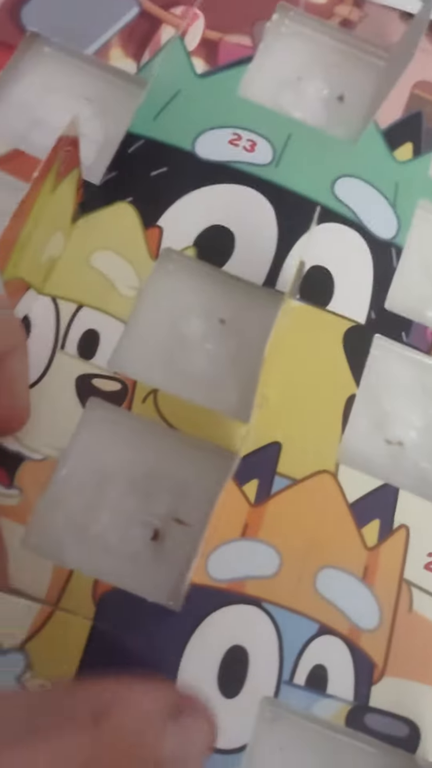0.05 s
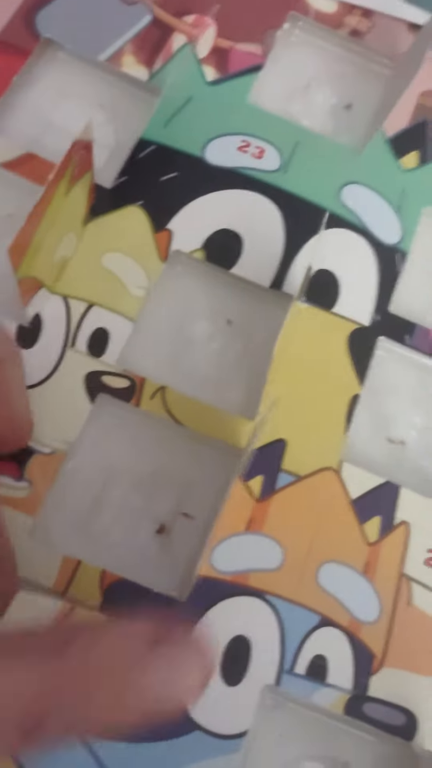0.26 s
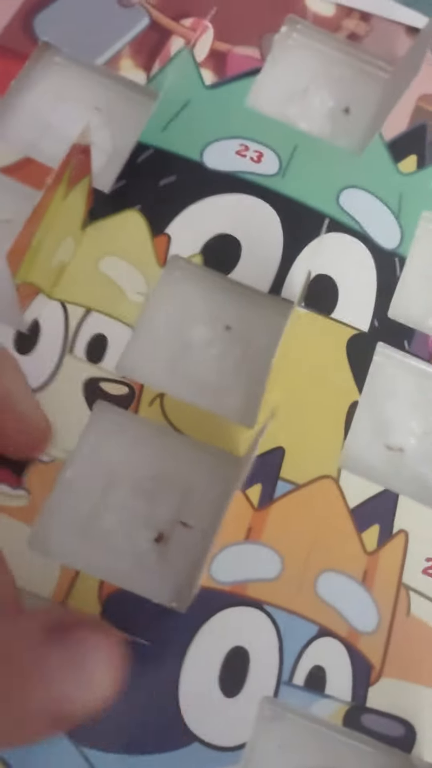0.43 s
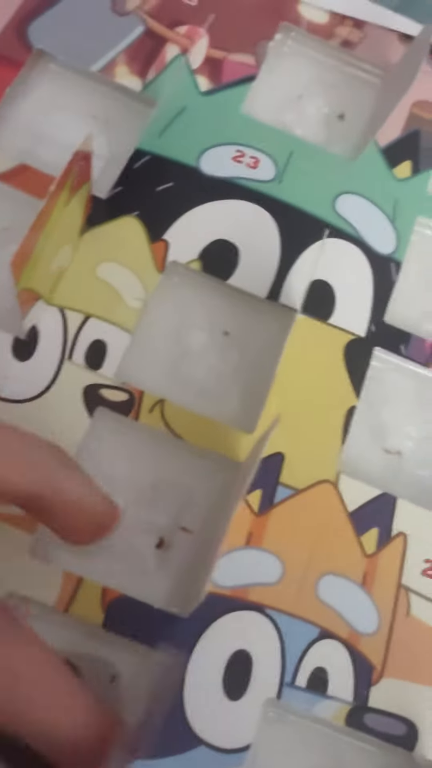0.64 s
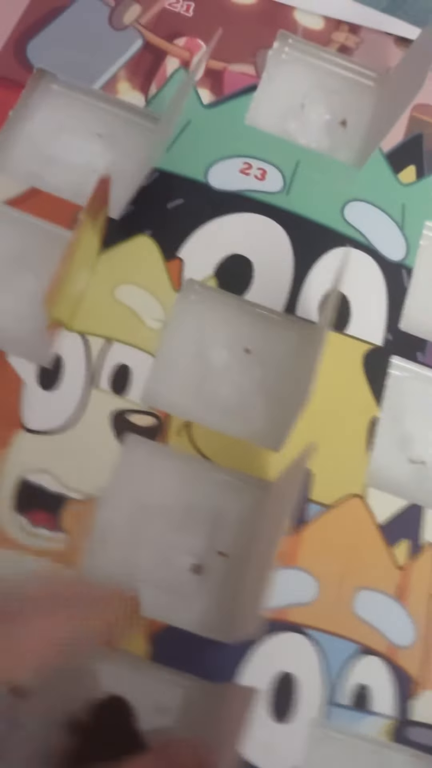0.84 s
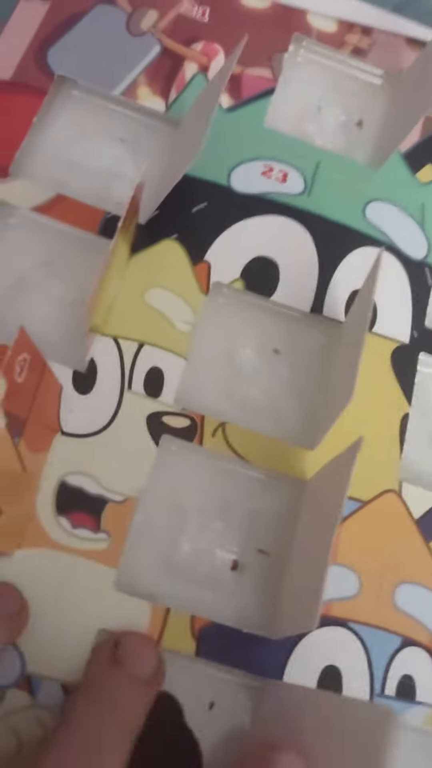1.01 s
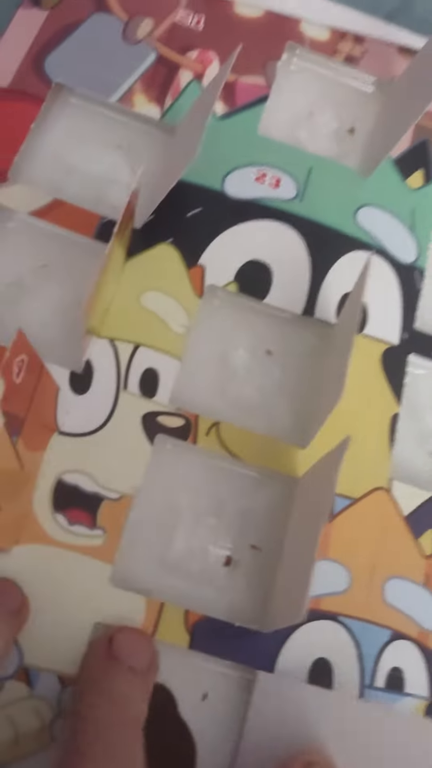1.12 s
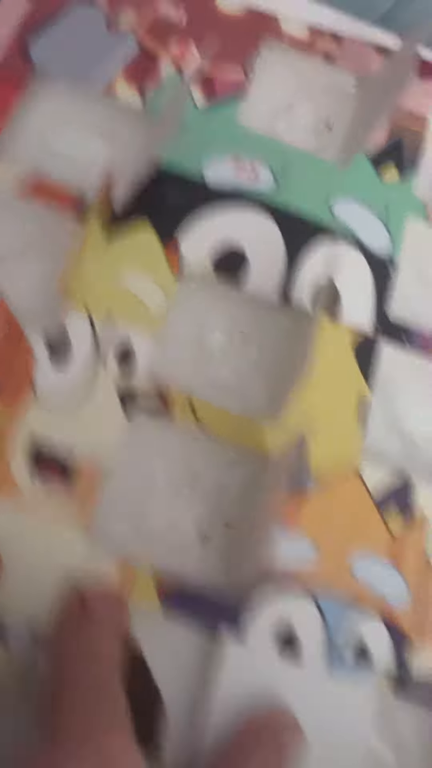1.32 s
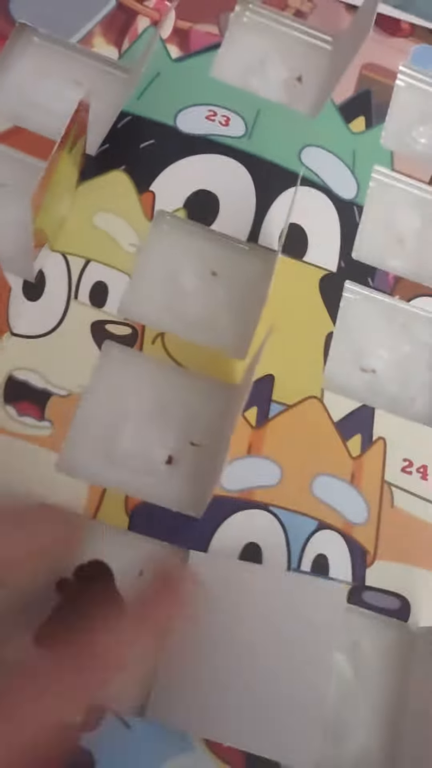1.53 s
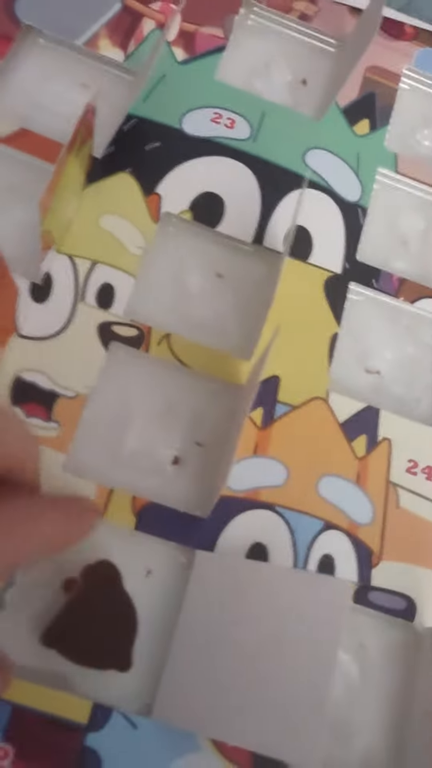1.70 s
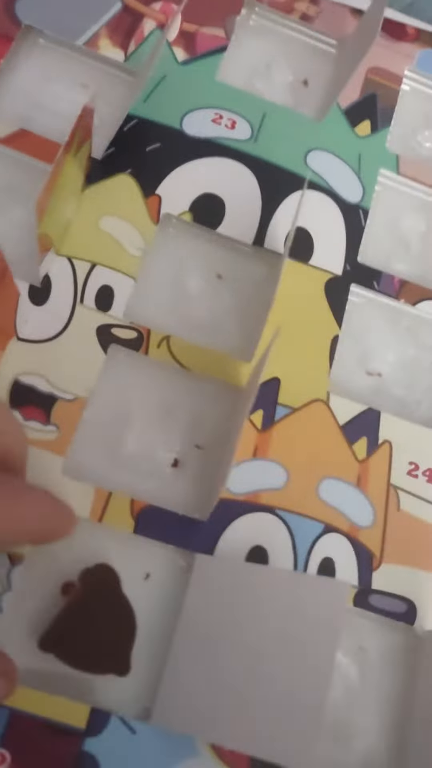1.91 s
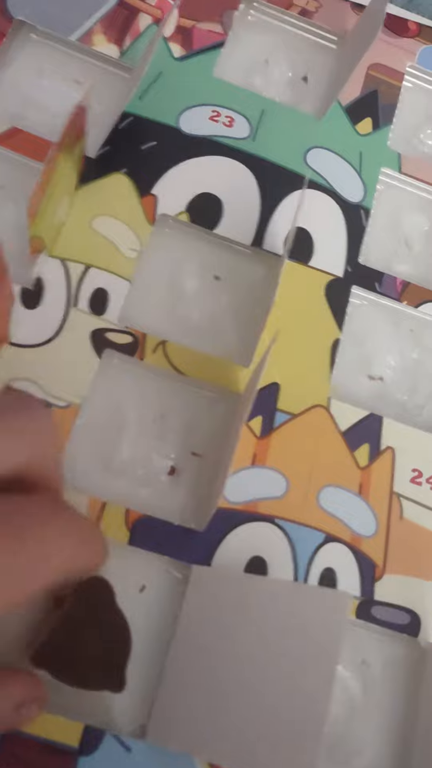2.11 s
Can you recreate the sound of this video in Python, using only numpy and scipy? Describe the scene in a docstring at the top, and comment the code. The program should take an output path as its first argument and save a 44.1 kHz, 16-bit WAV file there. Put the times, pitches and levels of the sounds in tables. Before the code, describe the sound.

A finger tears open a perforated cardboard door, with sharp snaps and hollow knocks in the first half second, then a small dry creak and light fingertip rubbing, close to a phone in a small quiet room.

```python
"""In a small room, close to a phone, a finger tears open a perforated door of a cardboard calendar.
The paper tabs snap one by one as bursts of noise, and four knocks ring the hollow box in decaying tones.
The plastic tray pings, and the door creaks on its fold in tiny slips and ringing grains.
Fingertips bump, tick and slide on the card, made of short or filtered noise; the room adds a brief
noise tail to it all, over a faint background."""
import sys
import numpy as np
from scipy import signal
from scipy.fft import rfft, irfft
from scipy.io import wavfile
from scipy.ndimage import uniform_filter1d, minimum_filter1d

SR = 44100
rng = np.random.default_rng(int(sys.argv[2]) if len(sys.argv) > 2 else 0)


def wrap_up_sound(samples):
    """Save the sound to the file named by the first command line argument, as 16-bit audio."""
    columns = np.atleast_2d(samples).T
    # keep every value between -1 and 1, then stretch to whole-number steps
    tamed = np.clip(columns, -1, 1)
    steps = np.round(tamed * 32767).astype(np.int16)
    wavfile.write(sys.argv[1], SR, steps)


N = 94815  # length of the scene in samples

# tone of fingertips sliding on card, also used for the ring left at the start: f/Hz, level/dB
SLIDE_TONE = [(200, -11.5), (500, 0), (1400, 0.5), (2000, -2.5), (5400, -2), (7200, 1.5), (8500, -6.5),
              (15000, -5.5)]
CLICK_SPREAD, RUSTLE_SPREAD = .5, .75  # opposed part over shared part, left and right
SLIDE_RATE, SLIDE_SCATTER_DB = 3000, 4  # slips per second, unevenness of their levels


def amp(db):
    """Turn decibels into a gain."""
    return 10 ** (np.asarray(db) / 20)


def unit(x):
    """Scale to an rms of 1."""
    return x / np.sqrt(np.mean(x ** 2) + 1e-30)


def decay(t, t60):
    """A fade that falls by 60 dB in t60 seconds."""
    return np.exp(-np.log(1000) * t / t60)


def colour(x, points):
    """Filter by a curve of (f/Hz, level/dB) points."""
    hz, db = np.array(points, float).T
    n = x.shape[-1]
    f = np.maximum(np.fft.rfftfreq(2 * n, 1 / SR), 1)
    gain = amp(np.interp(np.log(f), np.log(hz), db))
    return irfft(rfft(x, 2 * n) * gain)[..., :n]


def resonate(x, hz, width):
    """One resonance, with gain 1 at its centre."""
    b, a = signal.iirpeak(hz, hz / width, fs=SR)
    return signal.lfilter(b, a, x)


def add(out, x, s):
    """Mix a short sound in at a time in seconds."""
    i = int(s * SR)
    out[..., i:i + x.shape[-1]] += x[..., :N - i]


def at_level(x, db):
    """Give a short sound the energy of 5 ms at this level."""
    energy = np.mean(np.sum(x ** 2, axis=-1))
    return x * amp(db) * np.sqrt(.005 * SR / energy)


def two_ports(mid, side, spread):
    """Send a shared part and an opposed part to left and right."""
    return np.array([mid + spread * side, mid - spread * side])


def pan(x, db):
    """Make the left louder than the right by this much."""
    return x * amp([[db / 2], [-db / 2]])


def flutter(size, rate, depth_db):
    """A gain that wanders between random levels, with `rate` new levels per second."""
    levels = rng.standard_normal(size)
    return amp(depth_db * np.interp(np.arange(size) / SR * rate, np.arange(size), levels))


def background():
    """Faint room noise and a low rumble: two layers of filtered noise."""
    # tone of the room noise: f/Hz, level/dB
    floor_tone = [(20, -35.5), (65, -5), (300, 4), (1060, -12.5), (4640, -17), (5420, -24), (12100, -20.5),
                  (15700, -55.5), (22000, -120)]
    # tone of the rumble: f/Hz, level/dB
    rumble_tone = [(20, -22.5), (45, -11.5), (85, 5), (130, -15), (270, -5), (600, -20.5), (2000, -51.5)]
    out = np.zeros((2, N))
    for points, db in [(floor_tone, -68), (rumble_tone, -76)]:
        noise = two_ports(*rng.standard_normal((2, N)), spread=.36)
        out += unit(colour(noise, points)) * amp(db)
    return out


def room(x):
    """Reflections as fading noise: a quick dense tail and a fainter long one."""
    # tone of the tail: f/Hz, level/dB
    room_tone = [(120, -10.5), (250, 3), (600, 4), (1200, 0), (2500, 1.5), (4600, 0.5), (5300, 1.5),
                 (6100, 2.5), (8500, 1.5), (11000, -2.5), (15000, -12)]
    room_db, room_t60_s, swell_s = -17, .2, .0067  # the tail swells in before it fades
    late_db, late_t60_s = -26, .41  # long tail, relative to the quick one
    opening_db = -46.5  # start level of a ring already dying away
    t = np.arange(int(SR * .7)) / SR
    fade = decay(t, room_t60_s) + amp(late_db) * decay(t, late_t60_s)
    # reflections arrive in clumps
    clumps = rng.standard_normal((2, len(t))) * flutter(len(t), rate=400, depth_db=3.5)
    tail = colour(clumps, room_tone) * fade * np.minimum(t / swell_s, 1) ** 2
    tail = unit(tail) / np.sqrt(len(t)) * amp(room_db)
    dying = unit(colour(rng.standard_normal((2, N)), SLIDE_TONE))
    dying *= amp(opening_db) * decay(np.arange(N) / SR, room_t60_s)
    return signal.fftconvolve(x, tail, axes=1)[:, :N] + dying


def rustle(curve, tone, rate, scatter_db):
    """Dense tiny slips of uneven size that come in jerks, following a level curve."""
    happens = rng.random((2, N)) < rate / SR
    direction = rng.choice([-1, 1], (2, N))
    size = amp(scatter_db * np.minimum(rng.exponential(size=(2, N)), 4))
    jerky = happens * direction * size * flutter(N, rate=90, depth_db=2.8)
    rub = colour(two_ports(*jerky, RUSTLE_SPREAD), tone)
    s, db = np.array(curve).T
    return unit(rub) * amp(np.interp(np.arange(N) / SR, s, db, left=-120, right=-120))


def fold():
    """The door creaks on its fold as the card slips in small jerks."""
    # level curve, before the rubbing gain: t/s, level/dB
    fold_curve = [(.09, -79), (.2, -57), (.25, -39), (.37, -73), (.44, -49.5), (.62, -47.5), (.67, -54.5),
                  (.72, -66), (.95, -73), (1.03, -56.5), (1.14, -54.5), (1.19, -46.5), (1.27, -87.5)]
    # tone: f/Hz, level/dB
    fold_tone = [(200, -21), (450, -15.5), (1100, -23), (1900, -26.5), (2700, -8.5), (4300, -3), (5400, -7),
                 (6400, -11), (7600, 2.5), (8400, -2.5), (10000, -4), (11500, 3), (15000, -8)]
    return rustle(fold_curve, fold_tone, rate=1500, scatter_db=5)


def bumps():
    """Soft, dull fingertip touches: short noise pushes through two equal resonances of the card."""
    # touches: t/s, f/Hz, level/dB
    touches = [(.108, 606, -42.5), (.375, 700, -48.5), (.432, 507, -54), (.606, 336, -46.5),
               (.641, 327, -46.5), (1.225, 760, -48.5), (1.305, 524, -60), (1.396, 900, -55.5),
               (1.452, 680, -52.5), (1.523, 550, -58), (1.724, 763, -57.5), (1.908, 601, -60),
               (2.064, 305, -55), (2.103, 733, -57), (2.115, 760, -51.5), (2.131, 770, -54.5)]
    relative_width, decay_s = .6, .0025  # resonance width over pitch, fall of the push
    t, out = np.arange(SR // 16) / SR, np.zeros((2, N))
    for s, hz, db in touches:
        push = two_ports(*rng.standard_normal((2, len(t))), CLICK_SPREAD) * np.exp(-t / decay_s)
        once = resonate(push, hz, hz * relative_width)
        twice = resonate(once, hz, hz * relative_width)
        add(out, at_level(twice, db), s)
    return out


def clicks(rows):
    """Fibres start to part in a quick rise, a sharp crack tops it, and they fade within milliseconds.

    The bass and middle let go more slowly than the presence and treble."""
    # edges of the bass, middle, presence and treble bands: f/Hz
    band_edges = [190, 600, 3000, 7000, 14500]
    # release of a click in those four bands: time/s
    releases = [0.0029, 0.0032, 0.0017, 0.001]
    attack_s, crack_db = .0009, 5.5  # rise of the fibres; crack over the fibres
    size = 2048
    t, out = np.arange(size) / SR, np.zeros((2, N))
    bands = [signal.butter(3, band_edges[k:k + 2], "band", fs=SR, output="sos") for k in range(4)]
    for s, length, *dbs, pan_db in rows:
        fibres = two_ports(*rng.standard_normal((2, size)), CLICK_SPREAD)
        fibres *= np.minimum(t / attack_s, 1)
        fibres[:, int(attack_s * SR)] += amp(crack_db)
        for sos, db, release in zip(bands, dbs, releases):
            burst = fibres * np.exp(-np.maximum(t - length, 0) / release)
            band = at_level(signal.sosfilt(sos, burst), db)
            add(out, pan(band, pan_db), s)
    return out


def ticks():
    """Small ticks of card and tray, and the last fibres of the long tear, as very short clicks."""
    # ticks, before the tick gain: t/s, middle/dB, presence/dB, treble/dB, left minus right/dB
    tick_rows = [(0.109, -58.5, -55, -40.5, -7.5), (.1500, -46, -51, -39.5, 4), (0.1549, -67, -64, -41, 2),
                 (0.167, -44.5, -54, -71, -2), (0.2714, -33, -24, -39, 2), (0.2743, -33, -30, -33, 7),
                 (0.2811, -38, -29, -39, 4.5), (0.2871, -45, -29, -40, 5), (0.4075, -53, -48, -29.5, -1.5),
                 (0.4373, -59, -53, -42, -1), (0.4712, -50.5, -61, -38, -5), (0.6622, -79, -58, -43.5, -7),
                 (0.6862, -54.5, -47, -37, 3), (.9100, -45.5, -45, -45, -2), (1.0180, -70, -47.5, -44.5, 7),
                 (1.062, -68, -54, -45, 13), (1.1151, -66, -51, -40.5, 7.5), (1.1617, -83, -45, -38, 2),
                 (1.1757, -72, -45, -37.5, 7.5), (1.2098, -45.5, -36.5, -39, -2.5),
                 (1.213, -42.5, -35, -45, 2.5), (1.2258, -47, -47.5, -67, -7), (1.4081, -61, -50, -68, 1),
                 (1.3010, -62, -63, -70, 2), (1.5609, -52.5, -62, -61, 2.5), (1.986, -44, -43, -36, -1.5)]
    length_s, bass_db = .0007, -7.5  # bass relative to the middle
    rows = [(s, length_s, middle + bass_db, middle, *rest) for s, middle, *rest in tick_rows]
    return amp(-1.5) * clicks(rows)


def ring(modes):
    """Decaying modes, slightly detuned at every blow and a little different at the two ports."""
    detune = .01  # share by which a mode shifts from blow to blow
    t, out = np.arange(SR // 4) / SR, 0
    chance = rng.standard_normal((len(modes), 3))
    for k, ((hz, db, t60), c) in enumerate(zip(modes, chance)):
        pitch = hz * (1 + detune * c[0])
        phase = np.pi * k + .5 * c[1:, None]
        out = out + amp(db) * decay(t, t60) * np.sin(2 * np.pi * pitch * t + phase)
    return out * (1 - np.exp(-t / .001))  # soft start


def tray():
    """The thin plastic tray pings under the finger: short, bright decaying modes."""
    # pings: t/s, level/dB
    ping_rows = [(0.11, -53), (0.1483, -47), (1.408, -49.5)]
    # modes of the tray: f/Hz, level/dB, t60/s
    tray_modes = [(2400, -2.5, .025), (5280, -1, .014), (7450, -1.5, .012), (8500, -3, .015)]
    out = np.zeros((2, N))
    for s, db in ping_rows:
        add(out, pan(at_level(ring(tray_modes), db), db=-1.5), s)
    return out


def snaps():
    """Paper tabs break one by one, each a burst of parting fibres."""
    # breaks: t/s, tear length/s, bass/dB, middle/dB, presence/dB, treble/dB, left minus right/dB
    snap_rows = [(.2188, .0012, -36.5, -24.5, -25, -19.5, -1), (.2537, .0013, -27, -18, -15.5, -10, -1),
                 (.2588, .0016, -35, -17, -7, -15, -1.5), (.4942, .0024, -26.5, -17.5, -14, -15, -2),
                 (.5690, 0.0014, -28.5, -21.5, -17, -14, -3)]
    return clicks(snap_rows)


def box():
    """Breaking tabs let the panel spring back and ring the box in four knocks; place sets mode levels."""
    # knocks as a tab gives way, each at another place along the door's edge: t/s, level/dB
    knock_rows = [(.2205, -43.5), (.2610, -26.5), (.4960, -21), (.5712, -24)]
    # modes of the box: f/Hz, t60/s, then level/dB at the first, second, third and fourth knock
    box_modes = [(209, 0.099, -16, -13, -0.5, -1.5), (250, 0.067, -11, -6, -4.5, -5.5),
                 (325, .055, -11, -1, -4.5, -8), (375, .055, -8.5, -5, 4, -3), (470, .055, -6, -4.5, 4, 0),
                 (650, 0.042, -2.5, 0, 0, 1), (745, 0.037, 2.5, 4.5, 2, -7),
                 (954, 0.044, -3.5, -5.5, 0, 0.5), (1296, .035, 2.5, 2, -8.5, -9.5),
                 (1550, .025, -5, -1, -2, -6), (2580, 0.063, -10, 3, -5.5, -3.5)]
    out = np.zeros((2, N))
    for place, (s, db) in enumerate(knock_rows):
        modes = [(hz, dbs[place], t60) for hz, t60, *dbs in box_modes]
        add(out, at_level(ring(modes), db), s)
    return out


def slide():
    """Fingertips slide over the card in many tiny slips."""
    # level curve, before the rubbing gain: t/s, level/dB
    slide_curve = [(.6, -76), (.73, -59.5), (1.0, -64.5), (1.28, -75.5), (1.36, -53), (1.42, -56),
                   (1.51, -58.5), (1.54, -78), (1.7, -67.5), (1.84, -66), (1.9, -79.5)]
    return pan(rustle(slide_curve, SLIDE_TONE, SLIDE_RATE, SLIDE_SCATTER_DB), db=-2.5)


def creak():
    """The crease sticks and slips as the door swings wide; each slip is a tiny ringing grain."""
    # path of the squeak, before the doubling at the end: t/s, f/Hz, level/dB
    creak_path = [(1.0, 8000, -67.5), (1.08, 8000, -56), (1.15, 8300, -54), (1.175, 8700, -45),
                  (1.23, 8400, -58)]
    rate, scatter_db, detune, ring_s = 500, 4, .04, .0007  # grains per s, dB, share of pitch, s
    s, hz, db = np.array(creak_path).T
    t, out = np.arange(SR // 200) / SR, np.zeros((2, N))
    count = int((s[-1] - s[0]) * rate)
    for k, c in enumerate(rng.standard_normal((count, 5))):
        when = s[0] + (k + c[0]) / rate
        pitch = np.interp(when, s, hz) * (1 + detune * c[1])
        level = np.interp(when, s, db) + scatter_db * c[2]
        grain = np.exp(-t / ring_s) * np.sin(2 * np.pi * pitch * t + c[3:, None])
        add(out, grain * amp(level), when)
    return pan(out, db=.5) * 2


def brush():
    """The hand brushes the next door in many tiny slips."""
    # level curve, before the rubbing gain: t/s, level/dB
    brush_curve = [(2.045, -65), (2.084, -61.5), (2.097, -50.5), (2.11, -50), (2.137, -56.5), (2.15, -74)]
    # tone: f/Hz, level/dB
    brush_tone = [(200, -16), (780, 6), (1500, -5), (3300, -8), (7250, -0.5), (8700, -12.5), (11000, 5),
                  (15000, -6.5)]
    return rustle(brush_curve, brush_tone, SLIDE_RATE, SLIDE_SCATTER_DB)


def scuff():
    """A short scuff of tiny slips as the hand meets the next door."""
    # level curve, before the rubbing gain: t/s, level/dB
    scuff_curve = [(2.060, -67), (2.064, -54.5), (2.071, -50.5), (2.078, -62), (2.09, -67)]
    # tone: f/Hz, level/dB
    scuff_tone = [(300, -8.5), (2200, -8.5), (2570, 9), (2950, -8), (7300, -3.5), (15000, -10)]
    return rustle(scuff_curve, scuff_tone, SLIDE_RATE, SLIDE_SCATTER_DB)


def from_right(x):
    """The door is nearer the right port, so the left hears it later."""
    lag_s, n = .00015, np.arange(N)
    return np.array([np.interp(n - lag_s * SR, n, x[0]), x[1]])


def ports(x):
    """Each microphone port has its own peaks and notches; both fall at the top of the treble."""
    # response of the left port: f/Hz, level/dB
    left_response = [(200, 3), (1000, -0.5), (4500, -0.5), (5280, 4.5), (6500, -6.5), (7500, -8.5),
                     (8900, -18), (9800, 4.5), (11600, 3), (12600, -10.5), (15000, -24)]
    # response of the right port: f/Hz, level/dB
    right_response = [(200, -1.5), (1000, -3), (2600, 3.5), (4600, 1.5), (5000, 6.5), (5300, 14.5),
                      (5650, 6), (6100, 2.5), (7600, 3.5), (8500, 10), (9200, 2), (10400, -18), (11500, -9),
                      (12600, -21.5), (15000, -24.5)]
    # extra fall shared by both ports: f/Hz, level/dB
    treble_fall = [(12100, 0), (12600, -10)]
    both = np.array([colour(x[0], left_response), colour(x[1], right_response)])
    return colour(both, treble_fall)


def scene():
    """Snaps, knocks, ticks and rubbing card in a quiet room."""
    hits = snaps() + ticks() + box() + tray() + bumps()
    rubbing = amp(1.5) * (fold() + slide() + scuff() + brush())
    card = hits + rubbing + creak()
    return ports(from_right(card) + room(card)) + background()


def record(dry):
    """A very fast limiter turns down the loudest peaks, clipping squares them off, and the top is cut."""
    react_s, ceiling, cut_hz = .0002, 1.15, 15800  # the ceiling lies above full scale, 1
    size = int(react_s * SR) + 1
    needed = 1 / np.maximum(np.abs(dry) / ceiling, 1)
    gain = uniform_filter1d(minimum_filter1d(needed, size), size)
    limited = np.clip(dry * gain, -1, 1)
    low_pass = signal.ellip(8, .2, 70, cut_hz, fs=SR, output="sos")
    return np.clip(signal.sosfilt(low_pass, limited), -1, 1)


dry = scene()
out = record(dry)
wrap_up_sound(out)
```